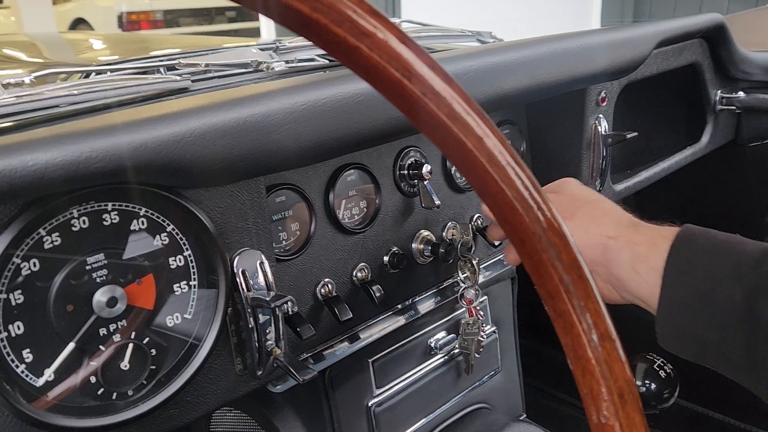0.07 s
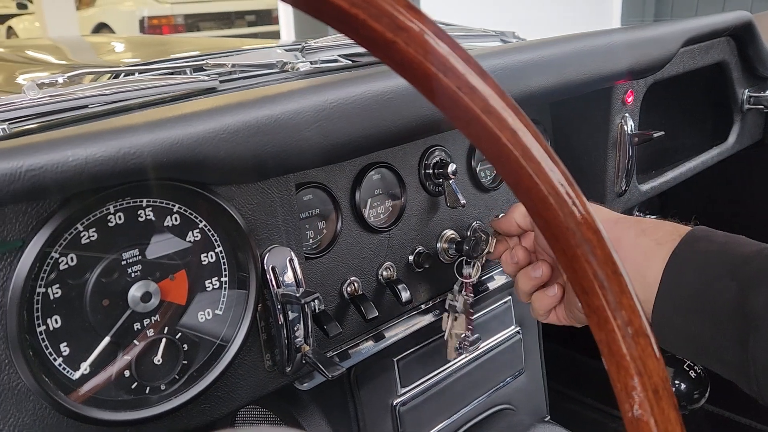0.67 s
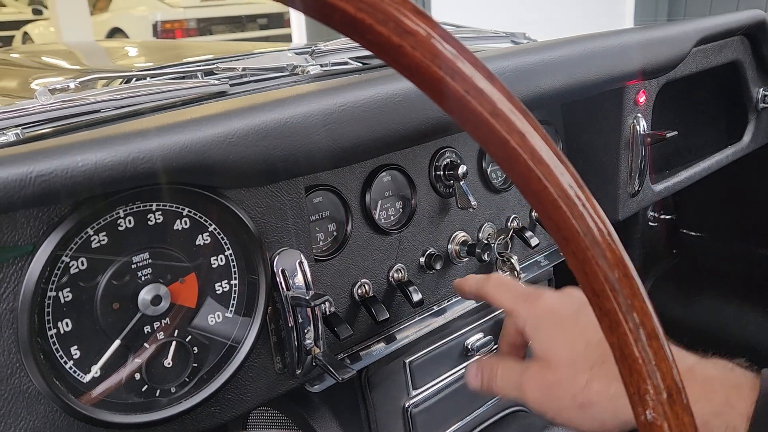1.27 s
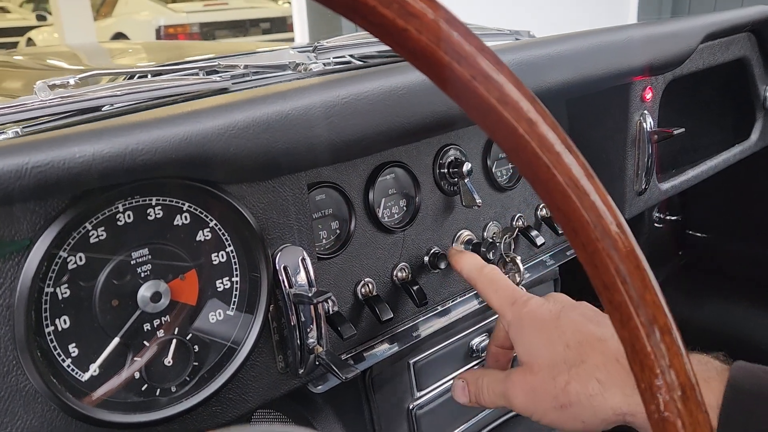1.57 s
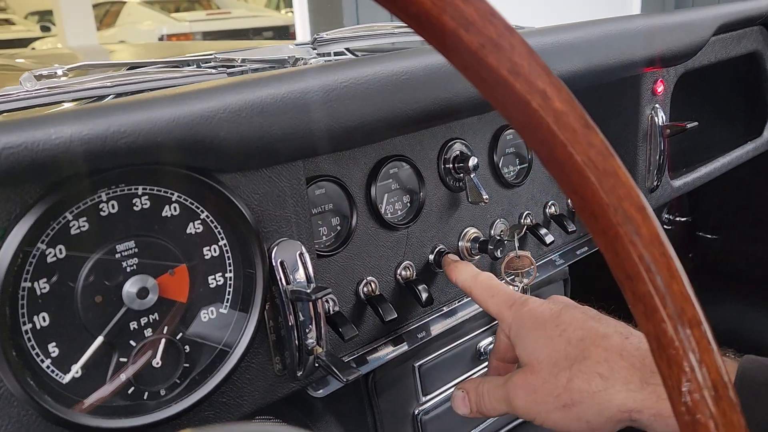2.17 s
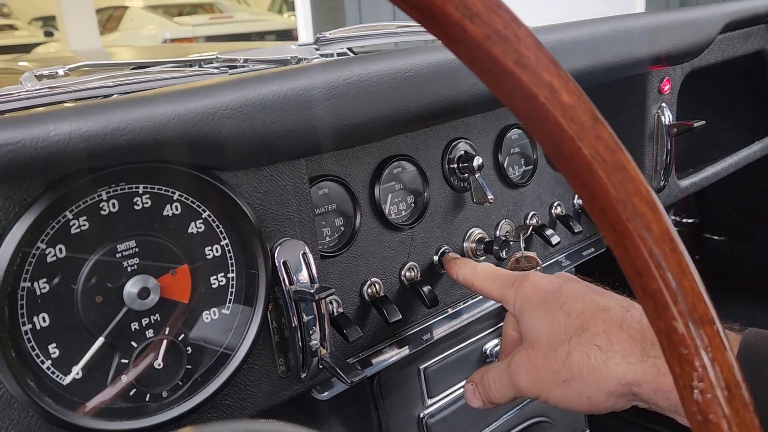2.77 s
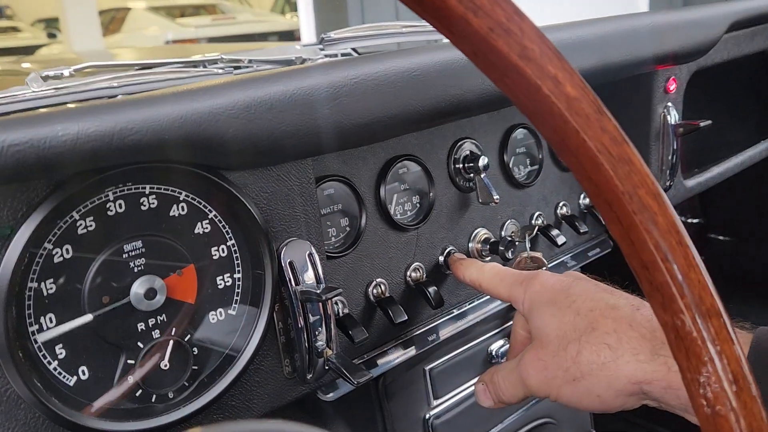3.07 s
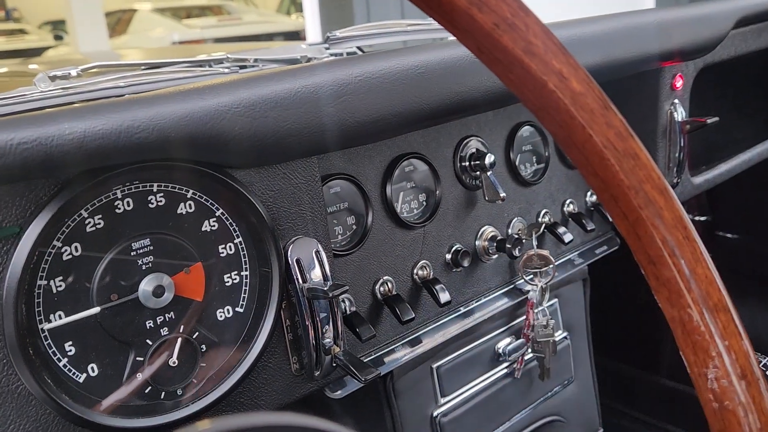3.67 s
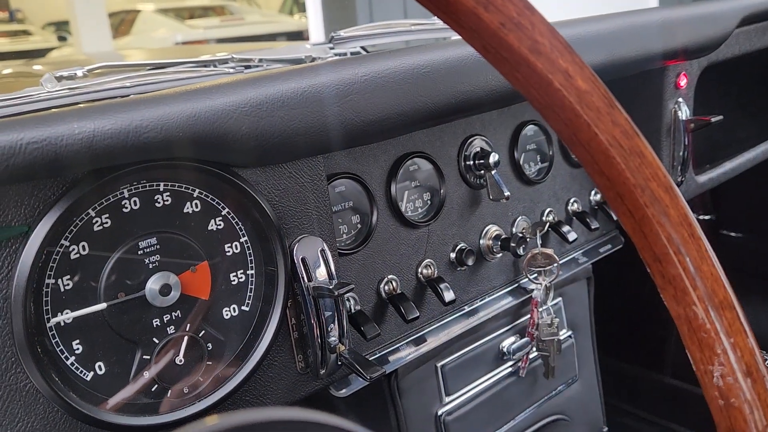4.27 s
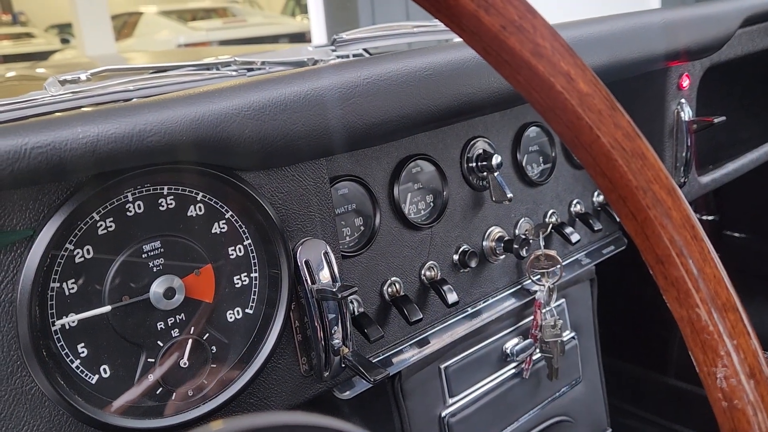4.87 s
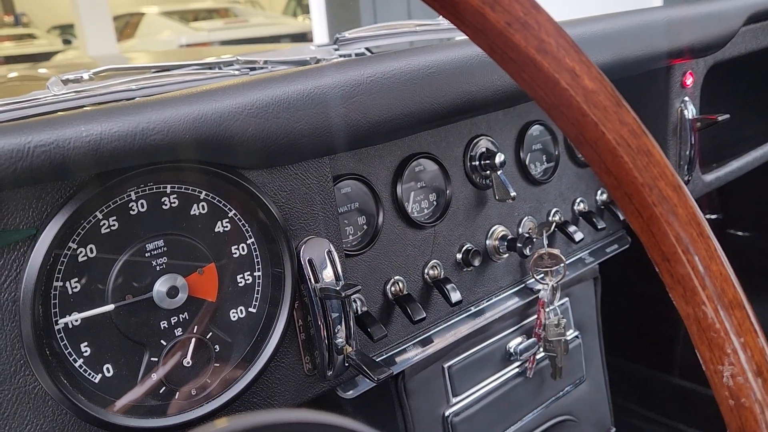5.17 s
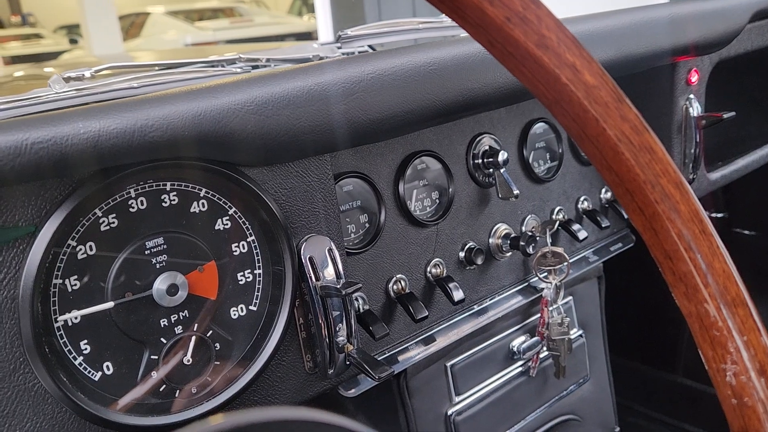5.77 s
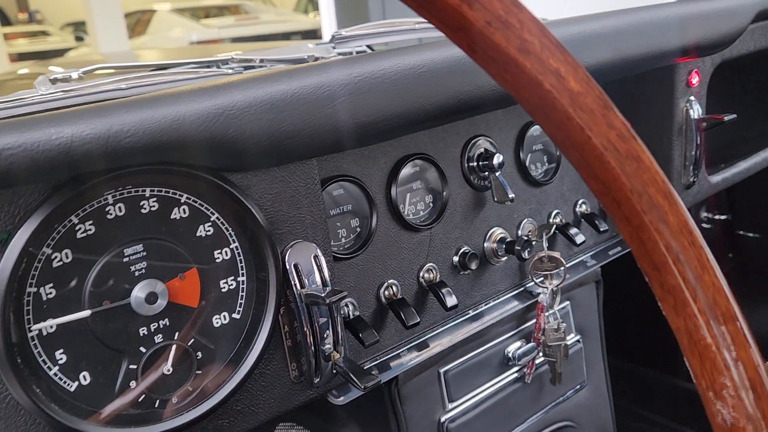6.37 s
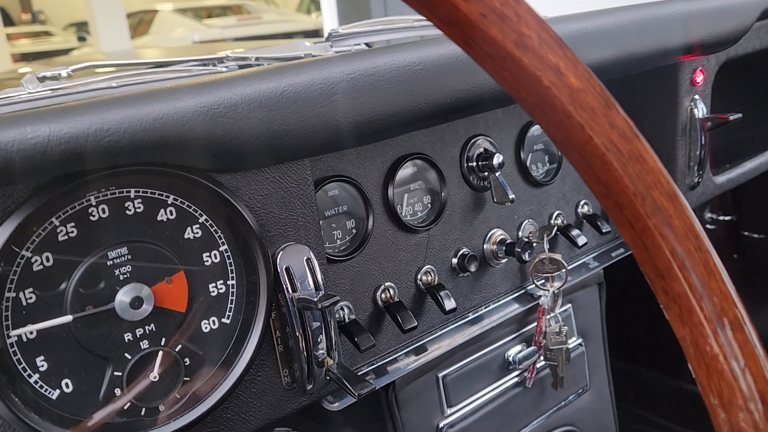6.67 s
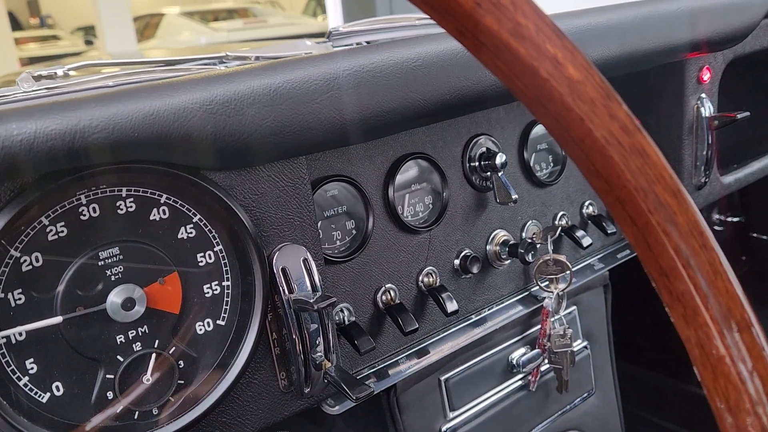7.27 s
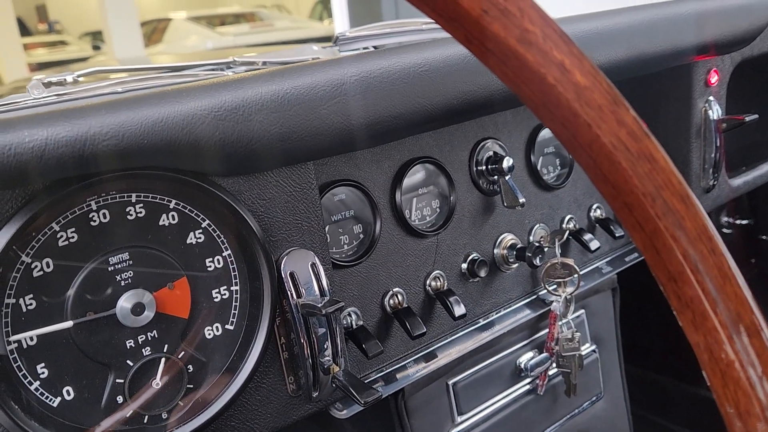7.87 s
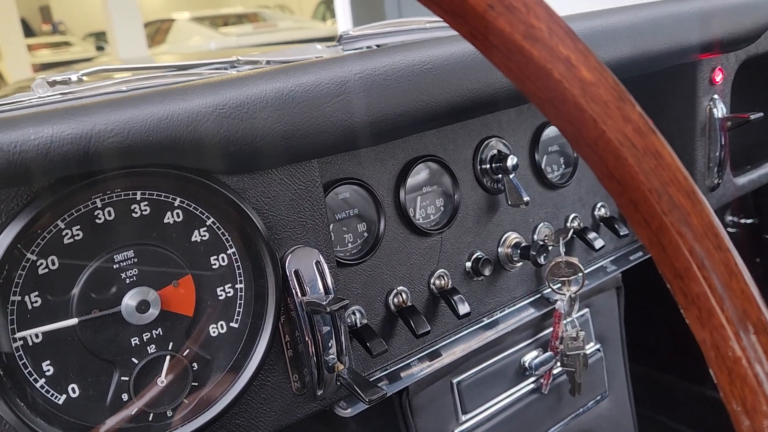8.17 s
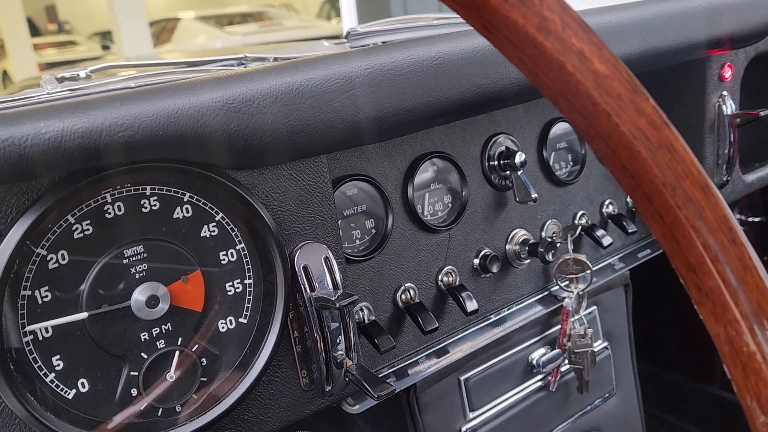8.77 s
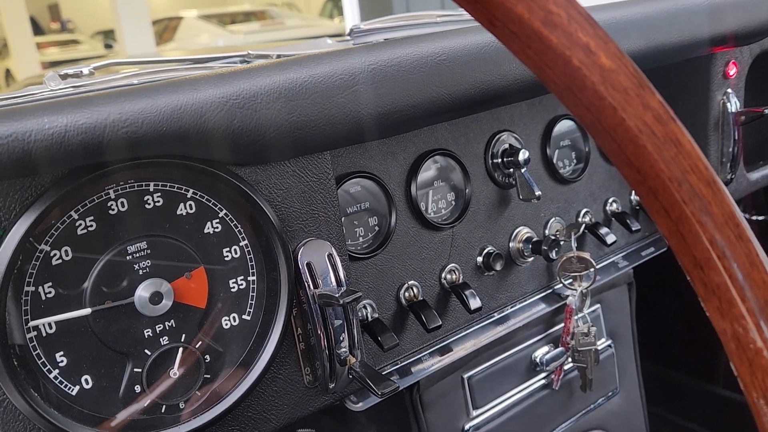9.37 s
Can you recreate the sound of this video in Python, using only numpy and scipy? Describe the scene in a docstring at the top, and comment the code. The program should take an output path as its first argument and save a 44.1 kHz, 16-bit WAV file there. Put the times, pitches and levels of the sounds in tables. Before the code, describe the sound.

An ignition key turns with a jingle, then an old car's engine cranks, fires and idles with a slightly uneven throb, heard from inside.

```python
"""Inside an old six-cylinder sports car, a key squeaks and turns in the lock, the bunch jingles and a
hand bumps the dashboard. The solenoid strikes and the starter cranks briefly, its gear teeth grinding.
The engine catches, flares with a rush of intake air and settles to a cold idle that creeps upward:
exhaust pulses boom in the pipe and cabin while the valves tick. One cylinder then misses on every
second cycle, so the exhaust stumbles five times a second."""
import sys
import numpy as np
from scipy import signal
from scipy.fft import rfft, irfft, next_fast_len
from scipy.io import wavfile
from scipy.ndimage import uniform_filter1d, map_coordinates

SR = 44100
rng = np.random.default_rng(int(sys.argv[2]) if len(sys.argv) > 2 else 0)


def generate_wav(sig):
    """Save sig (samples, or channels by samples) to the path in sys.argv[1] as 16-bit PCM at SR."""
    pcm = np.round(np.clip(np.atleast_2d(sig).T, -1, 1) * 32767).astype(np.int16)
    wavfile.write(sys.argv[1], SR, pcm)


N = 415863
TIME = np.arange(N) / SR
STARTER_ON_S, STARTER_OFF_S, IDLE_S = 2.53, 3.27, 3.5

# Levels in the tables are relative; each source adds its own gain.
# stereo width of noise: frequency_hz, side_minus_mid_db
STEREO_WIDTH = [(60, -20), (200, -18), (380, -3), (700, -8.5), (1290, 2.5), (4400, 0.5), (15000, -0.5)]
# spectra of the surroundings, dashboard knock, metal snap, thin keys, rubbing hand: frequency_hz, level_db
AMBIENT_SPECTRUM = [(12, -31), (20, -6.5), (68, -3.5), (88, -11.5), (146, -12.5), (163, -9.5), (301, -28),
                    (347, -21.5), (485, -37.5), (738, -28.5), (1760, -34.5), (3340, -48.5), (7520, -41),
                    (16000, -87)]
KNOCK_SPECTRUM = [(150, 0), (400, -2.5), (900, 0), (1900, -3), (2800, -15), (5000, -14.5)]
SNAP_SPECTRUM = [(1500, -24), (2800, -6.5), (4200, 0), (5000, 1), (6600, 6), (8600, 0), (10300, -14),
                 (12500, -2.5), (16000, -13.5)]
TINKLE_SPECTRUM = [(4500, -29), (7400, -10), (10500, -24), (11500, -24), (13000, -2), (14800, -5),
                   (15800, -3)]
RUB_SPECTRUM = [(45, -3), (80, 2), (130, -4), (200, -7), (330, -10), (500, -14.5)]
# contacts of lock, keys and switches: start_s, snap_db, knock_db, ring_db
CONTACTS = [(0.3538, -38.5, -44, -63), (0.4486, -23, -32, -34), (0.466, -28.5, -41, -37),
            (0.5218, -24.5, -36.5, -39), (0.546, -30, -40, -50), (0.5811, -35, -37.5, -47),
            (0.6582, -27.5, -43, -39), (0.707, -31, -48, -43), (0.7437, -33, -39, -39),
            (0.8011, -52, -48, -49), (0.83, -49, -41, -52), (0.8545, -45, -47, -39),
            (0.9366, -11, -25.5, -26), (0.9496, -15, -25, -25), (0.9924, -24.5, -42, -31.5),
            (1.0756, -32, -43, -34), (1.0927, -28, -50, -30.5), (1.14, -26, -32.5, -36),
            (1.1662, -17.5, -39.5, -33), (1.1781, -24, -55, -28), (1.28, -22, -49, -43),
            (1.3389, -38, -53, -39), (1.436, -24.5, -31.5, -36), (2.028, -40, -39, -62),
            (2.2995, -32.5, -57, -64)]
# modes of the keys: pitch_hz, level_db, t60_s
KEY_MODES = [(5540, -3, 0.14), (5640, 0, 0.11), (11400, -6, 0.19), (11500, -3, 0.18), (11740, -3.5, 0.19),
             (13610, -6, .09), (14620, 1, 0.24), (14800, -9, .11), (14800, -1, .17)]
# dashboard resonances: centre_hz, width_hz, lift_db
DASH_RESONANCES = [(780, 120, 3), (1220, 154, -3), (1710, 163, 4.5), (2110, 270, 7)]
# pushes of the hand on the dashboard: start_s, pitch_hz, level_db
HAND_BUMPS = [(0.771, 184.1, -35), (.80, 139, -44), (0.886, 191, -34), (0.939, 166, -35),
              (1.085, 183.4, -28.5), (1.11, 183.6, -43), (1.21, 157, -46), (1.278, 147.4, -41.5)]
# spectra of grinding gears and the shuddering body: frequency_hz, level_db
GRIND_SPECTRUM = [(120, -9), (220, -6), (290, -3.5), (390, -2), (490, -8.5), (720, -5), (1000, -11.5),
                  (1300, -11), (1600, -15.5), (3400, -13.5), (4400, -19), (8700, -38), (9500, -53),
                  (12400, -43), (16000, -54.5)]
SHUDDER_SPECTRUM = [(15, -13), (35, 2.5), (60, -2), (85, -7.5), (150, -9), (220, -16.5), (400, -34)]
# starter casing resonances: centre_hz, width_hz, lift_db
CASING_RESONANCES = [(375, 25, 5), (690, 40, 6), (775, 40, 8), (995, 40, 4), (1280, 220, 3), (2120, 80, 3),
                     (3460, 400, 3)]
# lurches against compression or a first firing: start_s, grind_db, shudder_db
LURCHES = [(2.606, -27.5, -26.5), (2.68, -43, -32), (2.844, -30.5, -29), (2.94, -31, -19.5),
           (3.01, -37, -10.5), (3.28, -62, -23)]
# gear mesh, sagging under compression and rising as the engine catches: time_s, pitch_hz
MESH_PITCH = [(2.62, 792), (2.73, 765), (2.8, 715), (2.86, 798), (2.97, 881)]
# impacts of solenoid and pinion, and a small knock at idle: start_s, knock_db, snap_db, thump_db
CLUNKS = [(2.535, -44, -47, -70), (2.552, -32.5, -45, -47), (2.615, -37, -36, -29.5),
          (2.626, -33, -37.5, -12), (2.856, -28, -55, -39.5), (6.918, -37.5, -64, -70)]
# modes of the solenoid plunger: pitch_hz, level_db, t60_s
PLUNGER_MODES = [(2830, -37, .18), (2930, -39, .17), (1290, -41, .12)]
# engine speed: time_s, firings_per_s
FIRING_RATE = [(2.6, 12), (2.9, 24.4), (3.08, 59), (3.2, 63.3), (3.3, 54.65), (4.2, 56.2), (4.55, 57.8),
               (6.3, 58.78), (6.9, 60.31), (7.5, 59.5), (8.3, 61.45), (8.7, 63.5), (9.43, 62.36)]
# spectrum of the intake air: frequency_hz, level_db
INTAKE_SPECTRUM = [(710, -31), (1250, -6.5), (2000, -11), (2500, -12), (3400, -6), (4500, -10.5),
                   (5600, -9.5), (6600, -16), (7600, -12), (9500, -28.5), (12200, -20.5), (16000, -26)]
# carburettor throat and air box resonances: centre_hz, width_hz, lift_db
AIR_BOX_RESONANCES = [(2610, 56, 0), (3040, 90, 5), (3150, 80, 3), (3480, 190, 7.5)]
# exhaust as the engine catches, flares, sags and settles: time_s, level_db, harmonic_lift_db
EXHAUST_EFFORT = [(2.92, -32, 0), (2.97, -0.5, -1), (3.02, -4, 8.5), (3.06, 1.5, 3.5), (3.1, .5, -2),
                  (3.21, -2, -20), (3.275, -14, 8), (3.315, -4, -1), (3.5, -2.5, -0.5)]
# cabin response to the firing harmonics: frequency_hz, level_db
CABIN_RESPONSE = [(40, -11), (63, -11), (74, -13.5), (108, -24), (118, -29.5), (167, -29), (175, -30.5),
                  (180, -34.5), (186, -25.5)]
# faint upper harmonics: firing_rate_multiple, level_db
OVERTONES = [(4, -63), (5, -61), (6, -58)]
# each cylinder's exhaust pulse, in firing order: deviation_from_mean
PULSE_DEVIATIONS = [0.71, -0.46, 0.18, -0.89, 0.78, -0.12]
# modes of the exhaust pipe and cabin air: pitch_hz, level_db, t60_s
PIPE_MODES = [(33.4, -5, 0.18), (70.6, 0, 0.3), (97.5, -1, 0.39), (122.5, -0.5, 0.26), (169.4, -7, 0.37),
              (203.6, -5, 0.23)]
# each cylinder's tick, in firing order: level_db
TAPPET_LEVELS = [2.5, -27, 3, -9, 5, -7]
# spectra of block clatter and valve ticking: frequency_hz, level_db
CLATTER_SPECTRUM = [(150, 7), (230, 2), (380, -2), (540, -9.5), (660, -4.5), (780, -8), (1000, -8),
                    (1300, -10.5), (1900, -16.5), (2400, -14.5), (3200, -20.5), (5000, -41)]
TICKING_SPECTRUM = [(2000, -12), (3300, -7.5), (4600, 0), (6800, -2.5), (7700, -0.5), (8600, -7.5),
                    (9700, -14.5), (11000, -13.5), (11900, -8), (13500, -11), (16000, -16.5)]
# resonances of the engine block and covers: centre_hz, width_hz, lift_db
BLOCK_RESONANCES = [(391, 33, 4), (693, 92, 3), (887, 73, 6.5), (983, 41, 8), (1552, 120, 4.5),
                    (2116, 64, 8), (3680, 180, 4.5), (4824, 150, 1.5), (6074, 140, 5), (6497, 100, 3.5),
                    (7340, 180, 3.5)]
# modes of the valve covers: pitch_hz, level_db, t60_s
COVER_MODES = [(2107, -1, 0.1), (4440, -8, 0.065), (4730, -5.5, 0.045), (4990, -1, 0.071),
               (5370, -1.5, 0.11), (5520, -1.5, 0.14), (7450, 1, 0.05)]
# bodywork hums as the engine starts: peak_s, pitch_hz, level_db, half_width_s
BODY_HUMS = [(3.223, 376.5, -41.5, .14), (3.38, 329, -34.5, .04), (3.476, 328, -43, 0.056)]
# occasional stumbles of other cylinders: time_s, depth_db
STUMBLES = [(5.29, 5), (6.73, 5.5), (7.43, 4), (7.71, 2), (8.1, 3)]
# modes of loose metal: pitch_hz, level_db, t60_s
CHINK_MODES = [(4630, 2, .07), (4690, -8, .05), (5350, -2, .05)]


def from_db(db):
    """Amplitude grows tenfold for every 20 dB."""
    return 10 ** (np.asarray(db) / 20)


def wander(per_s):
    """Smooth random modulation of unit power."""
    step = SR / per_s
    knots = rng.standard_normal(int(N / step) + 4)
    curve = map_coordinates(knots, [np.arange(N) / step + 1], order=2)
    return curve / np.sqrt(np.mean(curve ** 2))


def bell(peak_s, width_s):
    """Gaussian envelope of height 1."""
    return np.exp(-np.minimum(((TIME - peak_s) / width_s) ** 2, 40))


def hump(start_s, rise_s):
    """Critically damped response, peaking at 1 after one rise time."""
    age = np.clip((TIME - start_s) / rise_s, 0, 40)
    return age * np.exp(1 - age)


def swell(start_s, attack_s, release_s, fall_db_per_s):
    """Linear attack, hold at 1, exponential release."""
    attack = np.clip((TIME - start_s) / attack_s, 0, 1)
    return attack * from_db(-fall_db_per_s * np.maximum(TIME - release_s, 0))


def impulses(times_s, sizes):
    """Impulse train with the given times and sizes."""
    return np.bincount(np.clip(np.asarray(times_s) * SR, 0, N - 1).astype(int), sizes, N)


def poisson(per_s):
    """Poisson process: independent unit impulses at a mean rate."""
    return rng.random(N) < per_s / SR


def decay(clicks, t60_s):
    """Exponential decay after each impulse."""
    return signal.lfilter([1], [1, -from_db(-60 / (t60_s * SR))], clicks + 1e-18)


def ring(clicks, hz, t60_s):
    """Damped oscillator: a unit impulse starts a sine of height 1."""
    r, w = from_db(-60 / (t60_s * SR)), 2 * np.pi * hz / SR
    return signal.lfilter([0, np.sin(w)], [1, -2 * r * np.cos(w), r * r], clicks + 1e-18)


def struck(hits, modes):
    """Modal superposition in stereo: each hit excites each mode with a random strength."""
    return sum(from_db(db) * ring(hits * rng.standard_normal((2, N)), hz, t60) for hz, db, t60 in modes)


def burst(clicks, crack_t60_s, cabin_t60_s, cabin_db):
    """Impact envelope: direct sound and cabin reverberation add in power."""
    direct = decay(clicks ** 2, crack_t60_s / 2)
    scattered = from_db(2 * cabin_db) * decay(clicks ** 2, cabin_t60_s / 2)
    return np.sqrt(direct + scattered)


def noise(spectrum, resonances=(), ripple_db=1.5):
    """Stereo noise shaped by a spectrum and Lorentzian resonances; the mid signal has unit power."""
    size = next_fast_len(N)
    hz = np.fft.rfftfreq(size, 1 / SR) + 1

    def curve_db(points):
        point_hz, db = np.transpose(points)
        return np.interp(np.log(hz), np.log(point_hz), db)

    octaves_outside = np.maximum(0, np.log2(np.maximum(hz / spectrum[-1][0], spectrum[0][0] / hz)))
    colour_db = curve_db(spectrum) - 24 * octaves_outside
    for centre, width, lift in resonances:
        colour_db += lift / (1 + (2 * (hz - centre) / width) ** 2)
    # cabin reflections leave fine peaks and notches above the bass
    grid_hz = np.arange(0, SR / 2, 35)
    colour_db += ripple_db * np.interp(hz, grid_hz, rng.standard_normal(len(grid_hz)) * (grid_hz > 500))
    white = rfft(rng.standard_normal((2, size)))
    mid = irfft(white[0] * from_db(colour_db))[:N]
    side = irfft(white[1] * from_db(colour_db + curve_db(STEREO_WIDTH)))[:N]
    return np.array([mid + side, mid - side]) / np.std(mid)


def pan(x, left_db):
    """A level difference between the ears places a sound to one side."""
    return x * from_db(np.array([[left_db], [-left_db]]) / 2)


def surroundings():
    """Ambient noise: a faint, steady rumble with most of its power in the bass."""
    return from_db(-49) * noise(AMBIENT_SPECTRUM)


def lock_squeak():
    """Friction: the key rubs in the lock with a thin, unsteady tone that arches in pitch."""
    hz = (4020 + 420 * bell(peak_s=.28, width_s=.06)) * (1 + .008 * wander(per_s=300))
    return from_db(-65) * bell(peak_s=.28, width_s=.084) * np.sin(2 * np.pi * np.cumsum(hz) / SR)


def keys():
    """Impact excitation: lock and switch contacts knock the dashboard and set the keys ringing."""
    start_s, snap_db, knock_db, ring_db = np.transpose(CONTACTS)
    swing_peak_s = .93
    swing = from_db(-44) * bell(swing_peak_s, width_s=.34)
    touches = poisson(per_s=100) * swing * from_db(rng.normal(0, 2.4, N))
    # faint dry ticks while the hand moves to the button
    ticks = from_db(-56) * poisson(per_s=11) * (TIME > swing_peak_s) * (TIME < STARTER_ON_S)
    knocks = impulses(start_s, from_db(knock_db)) + from_db(-6) * touches
    snaps = impulses(start_s, from_db(snap_db)) + ticks + from_db(2.5) * touches
    strikes = impulses(start_s, from_db(ring_db))
    knock = burst(knocks, crack_t60_s=.027, cabin_t60_s=.15, cabin_db=-1)
    snap = burst(snaps, crack_t60_s=.017, cabin_t60_s=.11, cabin_db=-4.5)
    tinkle = burst(strikes + from_db(-9) * touches, crack_t60_s=.03, cabin_t60_s=.14, cabin_db=0)
    dashboard = from_db(-1.5) * knock * noise(KNOCK_SPECTRUM, DASH_RESONANCES, ripple_db=3.5)
    metal = from_db(-8) * snap * noise(SNAP_SPECTRUM, ripple_db=2)
    metal += pan(from_db(-4.5) * tinkle * noise(TINKLE_SPECTRUM, ripple_db=4), left_db=-2.5)
    metal += from_db(-6) * struck(strikes + touches, KEY_MODES)
    # grazing touches give short clinks of scattered pitch
    pitch_index = rng.integers(0, 12, N)
    for k, hz in enumerate(np.geomspace(12000, 15500, 12)):
        clinks = ring(from_db(-10) * touches * (pitch_index == k), hz, t60_s=.04)
        metal += pan(clinks, left_db=rng.normal(0, 5))
    rubbing = from_db(1) * swing * noise(RUB_SPECTRUM)
    return dashboard + pan(metal, left_db=-.5) + rubbing


def hand_bumps():
    """Damped panel vibration: soft pushes of the hand make the dashboard hum briefly."""
    return sum(from_db(db) * hump(s, rise_s=.019) * np.sin(2 * np.pi * hz * (TIME - s))
               for s, hz, db in HAND_BUMPS)


def starter(firings):
    """Gear-mesh vibration: teeth grind and whine on the flywheel while the body shudders."""
    meshed = swell(LURCHES[0][0], .014, STARTER_OFF_S, fall_db_per_s=58)
    unloaded = from_db(-2) * swell(STARTER_ON_S, .017, STARTER_OFF_S, fall_db_per_s=58)
    grind = from_db(-33) * np.maximum(meshed, unloaded)
    shudder = from_db(-30) * meshed
    for start_s, grind_db, shudder_db in LURCHES:
        lurch = hump(start_s, rise_s=.021)
        grind += from_db(grind_db) * lurch
        shudder += from_db(shudder_db) * lurch
    teeth = 1 + .33 * np.cos(2 * np.pi * 35 * firings)
    gears = from_db(-2.5) * grind * teeth * noise(GRIND_SPECTRUM, CASING_RESONANCES, ripple_db=4)
    mesh_hz = np.interp(TIME, *np.transpose(MESH_PITCH)) * (1 + .018 * wander(per_s=100))
    phase = 2 * np.pi * np.cumsum(mesh_hz) / SR
    whining = swell(MESH_PITCH[0][0], .024, MESH_PITCH[-1][0], fall_db_per_s=300)
    whine = from_db(-10) * grind * whining * (np.sin(phase) + from_db(-6) * np.sin(1.7 * phase))
    return gears + whine + shudder * noise(SHUDDER_SPECTRUM)


def clunks():
    """Impact transients: the solenoid rings, the pinion slams in, and one small knock follows at idle."""
    start_s, knock_db, snap_db, thump_db = np.transpose(CLUNKS)
    knock = burst(impulses(start_s, from_db(knock_db)), crack_t60_s=.02, cabin_t60_s=.13, cabin_db=-5)
    snap = burst(impulses(start_s, from_db(snap_db)), crack_t60_s=.02, cabin_t60_s=.22, cabin_db=-2)
    thump = ring(impulses(start_s, from_db(thump_db)), hz=101.5, t60_s=.15)
    strike = impulses(times_s=[2.553], sizes=[1])
    plunger = sum(from_db(db) * ring(strike, hz, t60) for hz, db, t60 in PLUNGER_MODES)
    return knock * noise(KNOCK_SPECTRUM, DASH_RESONANCES) + snap * noise(SNAP_SPECTRUM) + thump + plunger


def pulsation(taps, running, depth):
    """Amplitude modulation by the valve taps, averaging 1 while the engine runs."""
    ticks = decay(taps, t60_s=.08)
    return (1 + depth * ticks) / (1 + depth * np.mean(ticks[running > .5]))


def intake(taps, running):
    """Flow noise: air rushes in with the flare, drops as the throttle closes and leaves a fading hiss."""
    start_s, peak_s, rise_db_per_s = 2.78, 3.033, 70
    opening = from_db(-rise_db_per_s * np.maximum(peak_s - TIME, 0))
    rush = from_db(-27.5) * swell(start_s, .014, peak_s, fall_db_per_s=97)
    hiss = from_db(-38.5) * swell(start_s, .036, peak_s, fall_db_per_s=21.5)
    air = noise(INTAKE_SPECTRUM, AIR_BOX_RESONANCES, ripple_db=3)
    return pan(opening * (rush + hiss) * pulsation(taps, running, depth=.34) * air, left_db=-3)


def exhaust_boom(firings, running, miss_s, depth_db):
    """Forced response: the cabin weights the firing harmonics; the fundamental dips at each miss."""
    offset_s = np.arange(-SR // 10, SR // 10) / SR
    dip = np.exp(-.5 * (offset_s / .017) ** 2)
    dip_db = signal.fftconvolve(impulses(miss_s, depth_db), dip, "same")
    time_s, level_db, lift_db = np.transpose(EXHAUST_EFFORT)
    effort, lift = (from_db(np.interp(TIME, time_s, db)) for db in (level_db, lift_db))
    firing_hz = np.interp(TIME, *np.transpose(FIRING_RATE))
    first, second, third = (from_db(np.interp(k * firing_hz, *np.transpose(CABIN_RESPONSE)))
                            for k in (1, 2, 3))
    # the crank falls behind at a miss and hunts a little
    phase = 2 * np.pi * (firings - .0267 * dip_db + .016 * wander(per_s=8))
    fundamental = first * from_db(-dip_db) * np.sin(phase)
    harmonics = second * np.cos(2 * phase) - third * np.sin(3 * phase)
    overtones = sum(from_db(db) * np.sin(k * phase) for k, db in OVERTONES)
    return np.sqrt(2) * (effort * (running > 0) * (fundamental + lift * harmonics) + running * overtones)


def exhaust_pipe(fired_s, running, miss_s, depth_db):
    """Air-column resonance: uneven and missed pulses excite the modes of the pipe."""
    deviations = np.resize(PULSE_DEVIATIONS, len(fired_s)) + .4 * rng.standard_normal(len(fired_s))
    # a missed pulse is smeared along the pipe and leaves a soft hole in the flow
    missed_s = fired_s[np.abs(fired_s[:, None] - (miss_s - .018)).argmin(axis=0)]
    holes = uniform_filter1d(impulses(missed_s, np.sqrt(np.abs(depth_db))), size=170)
    jolts = running * (from_db(-30.5) * impulses(fired_s, deviations) - from_db(-30) * holes)
    pipe = sum((-1) ** k * from_db(db) * ring(jolts, hz, t60)
               for k, (hz, db, t60) in enumerate(PIPE_MODES))
    muffled = signal.sosfilt(signal.butter(4, 235, fs=SR, output="sos"), pipe)
    return pan(muffled, left_db=2.5)


def clatter(taps, running):
    """Structure-borne sound: valves and pistons tap the block and covers, easing as the oil comes up."""
    idling_s = np.maximum(TIME - IDLE_S, 0)
    block_gain = from_db(-42.18 - .17 * idling_s)
    valve_gain = from_db(-49 - .77 * idling_s + 1.2 * wander(per_s=30))
    covers = from_db(-4) * struck(taps, COVER_MODES)
    block = pulsation(taps, running, depth=.18) * noise(CLATTER_SPECTRUM, BLOCK_RESONANCES, ripple_db=2)
    valves = pulsation(taps, running, depth=.53) * noise(TICKING_SPECTRUM, BLOCK_RESONANCES, ripple_db=2.5)
    return running * (pan(block_gain * block, left_db=.5) + pan(valve_gain * (valves + covers), left_db=-4))


def body_hum():
    """Sympathetic vibration: panels swell into a wavering hum as the engine shakes through its start."""
    return sum(from_db(db) * bell(s, width) * (1 + .3 * wander(per_s=25)) * np.sin(2 * np.pi * hz * TIME)
               for s, hz, db, width in BODY_HUMS)


def misfires(firings):
    """Subharmonic modulation: times and depths of a miss every second cycle, plus the odd stumble."""
    firings_per_miss, anchor_s, onset_s = 12, 4.2, .7
    first = np.interp(anchor_s, TIME, firings) % firings_per_miss
    miss_s = np.interp(np.arange(first, firings[-1], firings_per_miss), firings, TIME)
    miss_s = miss_s[miss_s > IDLE_S]
    setting_in = np.clip((miss_s - IDLE_S) / onset_s, 0, 1) ** 2
    depth_db = rng.normal(3.5, 1.33, len(miss_s)) * setting_in
    return np.vstack([np.column_stack([miss_s, depth_db]), STUMBLES]).T


def chinks():
    """Free vibration: loose metal is struck at random once the engine idles."""
    hits = poisson(per_s=19) * np.clip((TIME - IDLE_S) / 3, 0, 1)
    return from_db(-52) * struck(hits, CHINK_MODES)


def scene():
    """Superposition of keys, starter and engine; one count of firings times the engine's pulses."""
    firings = np.cumsum(np.interp(TIME, *np.transpose(FIRING_RATE))) / SR
    fired_s = TIME[1:][np.diff(np.floor(firings)) > 0]
    running = np.clip((TIME - 2.9) / .12, 0, 1)
    starting = lock_squeak() + keys() + hand_bumps() + starter(firings) + clunks()
    tap_db = np.resize(TAPPET_LEVELS, len(fired_s)) + rng.normal(0, 1, len(fired_s))
    taps = impulses(fired_s, from_db(tap_db))
    misses = misfires(firings)
    exhaust = exhaust_boom(firings, running, *misses) + exhaust_pipe(fired_s, running, *misses)
    exhaust[1] = np.interp(TIME - .0002, TIME, exhaust[1])  # the boom reaches the left side first
    engine = intake(taps, running) + exhaust + clatter(taps, running) + body_hum() + chinks()
    return surroundings() + starting + engine


def record(dry):
    """After a moment of near silence, soft saturation rounds the peaks and a low-pass cuts the top."""
    opened = dry * np.clip((TIME - .11) / .0059, .015, 1)
    rounded = opened / (1 + (opened / .95) ** 8) ** (1 / 8)
    return signal.sosfilt(signal.ellip(12, .1, 80, 15900, fs=SR, output="sos"), rounded)


dry = scene()
out = record(dry)
generate_wav(out)
```